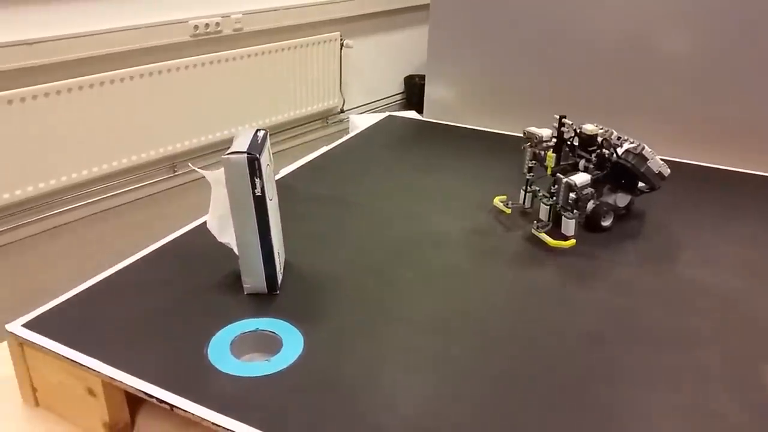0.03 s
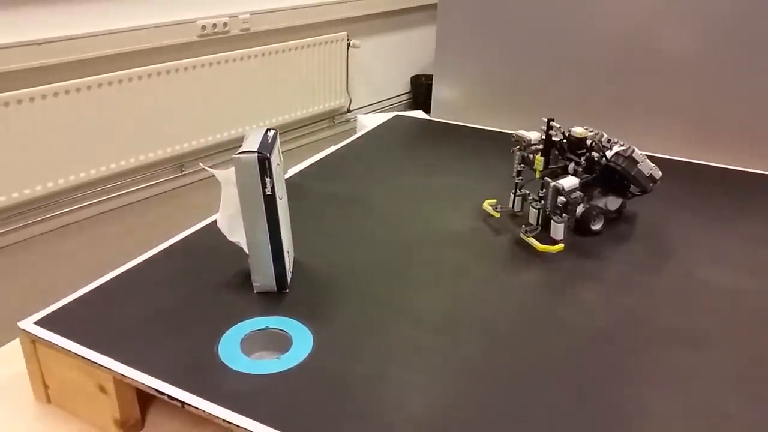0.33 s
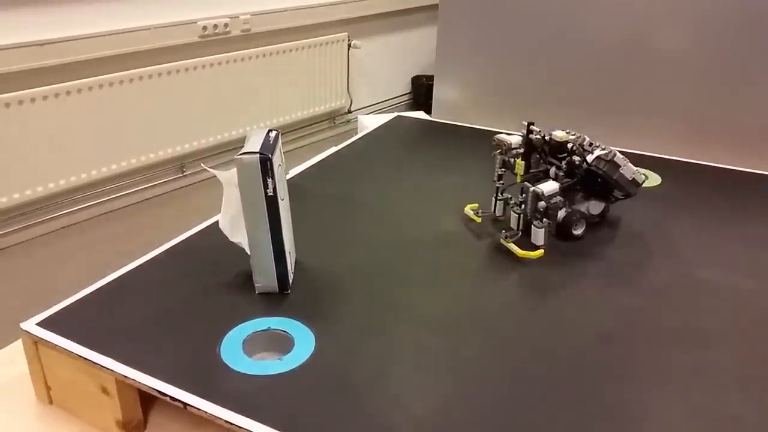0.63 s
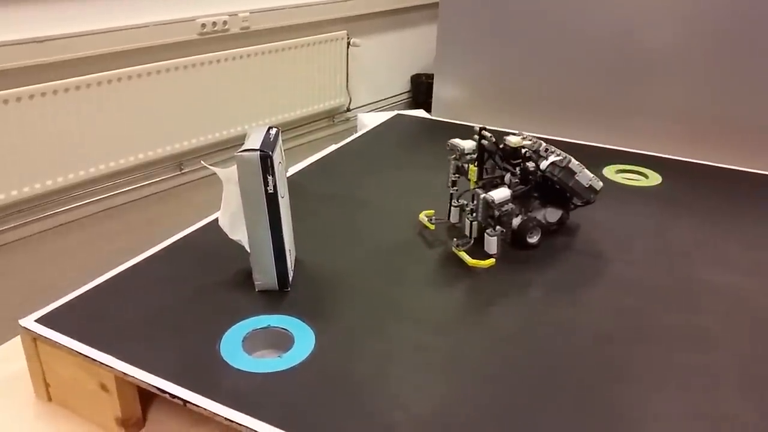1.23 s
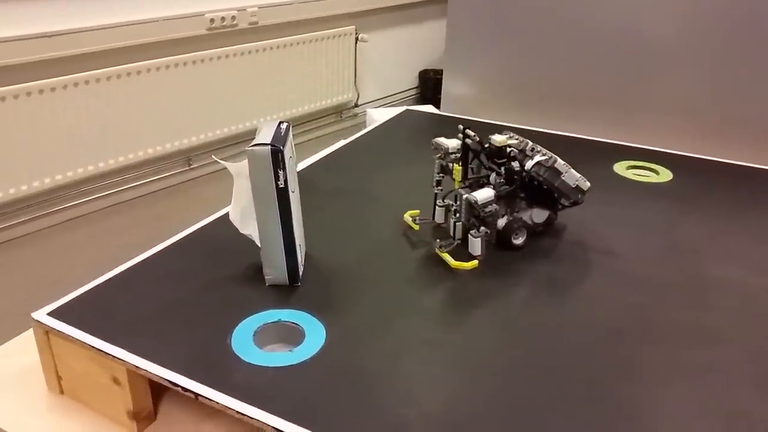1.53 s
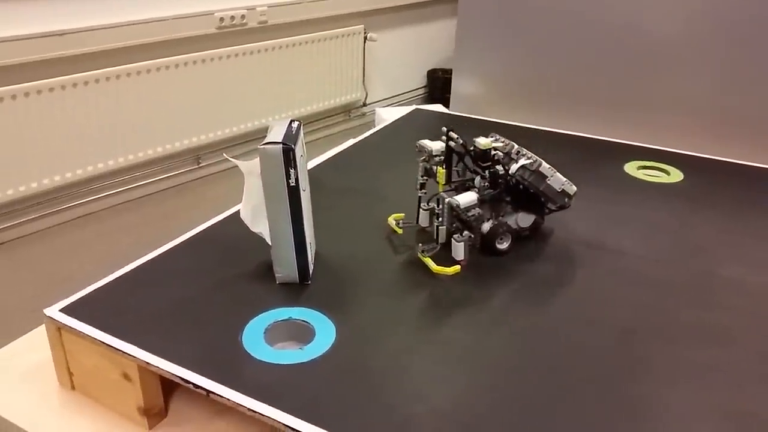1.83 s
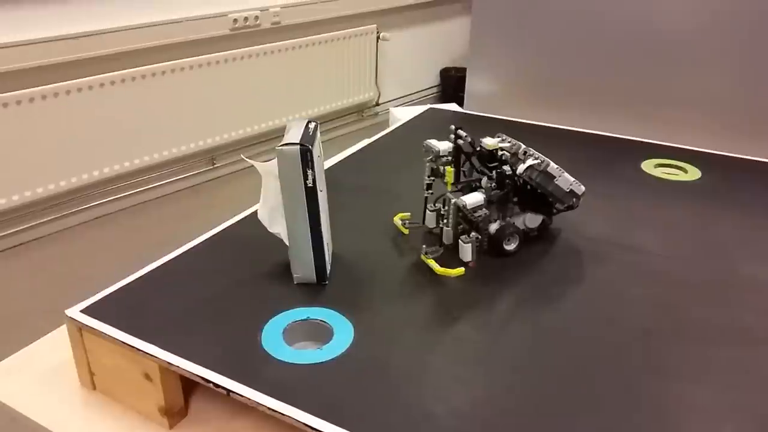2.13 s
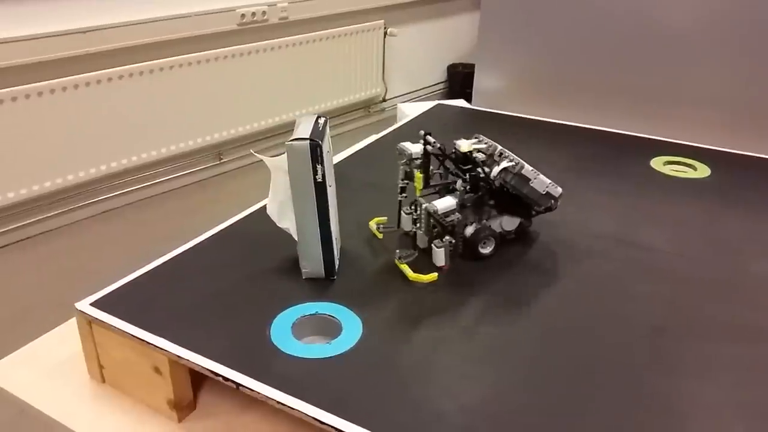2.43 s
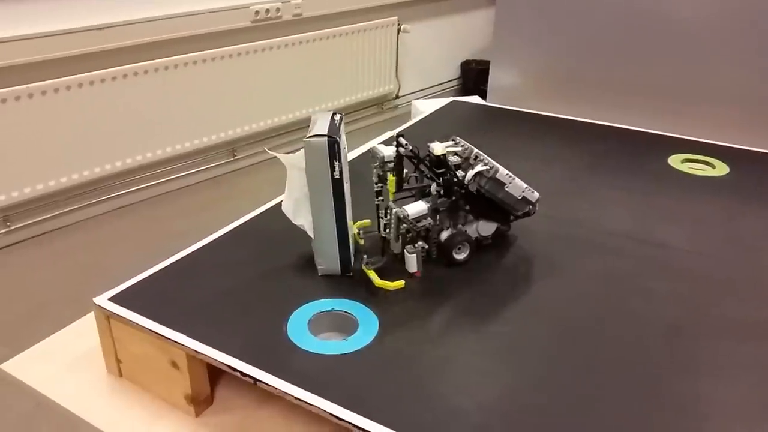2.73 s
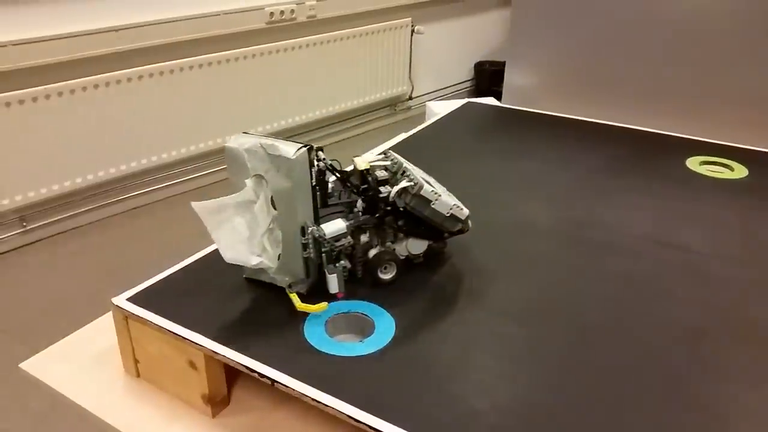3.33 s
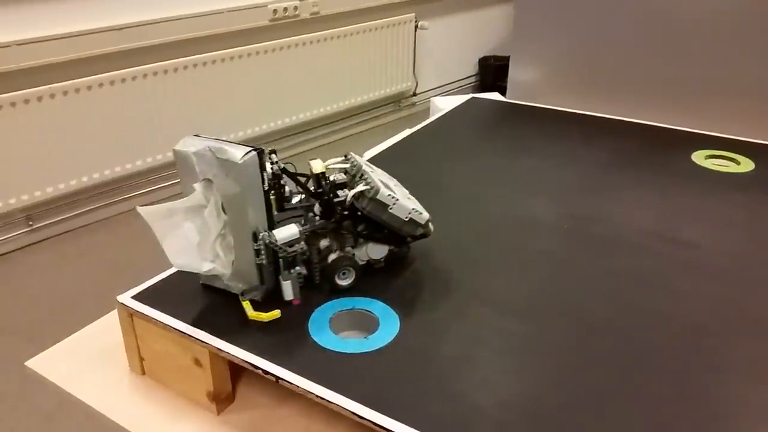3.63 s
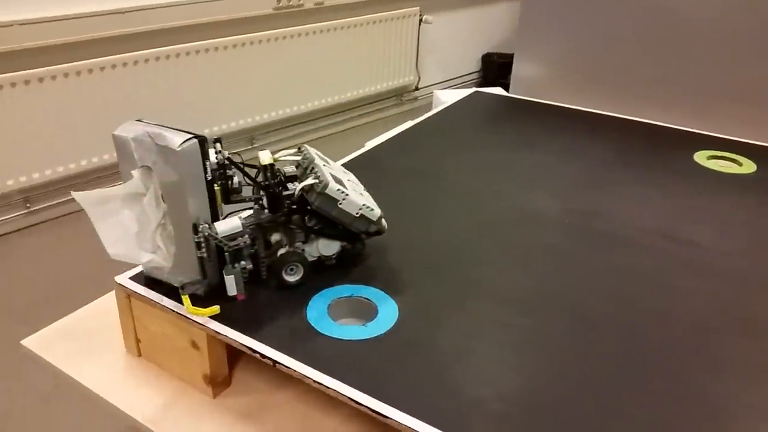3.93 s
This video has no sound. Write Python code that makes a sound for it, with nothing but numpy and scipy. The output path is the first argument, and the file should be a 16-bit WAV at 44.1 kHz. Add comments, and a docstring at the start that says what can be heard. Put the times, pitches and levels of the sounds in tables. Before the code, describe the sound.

Whirring, rattling robot gears stop briefly, then speed up as a box scrapes along.

```python
"""Small robot pushing a box

A robot drives over a table on two geared motors, brakes with a thump, restarts faster, pushes a box.
Gear teeth whine and rattle in the chassis; the wheels make the table top drone and rumble.
The box knocks and scrapes along. Close stereo microphone, small room, low ventilation hum."""
import sys
import numpy as np
from scipy import signal
from scipy.fft import rfft, irfft
from scipy.io import wavfile
from scipy.ndimage import map_coordinates

SR = 44100
rng = np.random.default_rng(int(sys.argv[2]) if len(sys.argv) > 2 else 0)


def wav_record(signal):
    """Record a signal, one row per channel, as 16-bit PCM in the file named by sys.argv[1]."""
    frames = np.transpose(np.atleast_2d(signal))
    bounded = np.clip(frames, -1, 1)
    # unit amplitude maps onto the largest positive 16-bit level
    quanta = np.round(bounded * 32767).astype(np.int16)
    wavfile.write(sys.argv[1], SR, quanta)


N = 176400
T = np.arange(N) / SR
HZ = np.fft.rfftfreq(N, 1 / SR)

# ventilation spectrum: f/Hz, level/dB
VENT_SPECTRUM = [(20, -11), (45, 3), (110, -2.5), (260, -9.5), (700, -29), (3000, -21.5), (16000, -45)]
# table top, main mode and other modes: t/s, level/dB
DRONE_LEVEL = [(0, -42), (.9, -38.5), (1.05, -34), (1.55, -37), (2, -41.5), (2.1, -46.5), (2.24, -38.5),
               (2.32, -45), (3.1, -49), (3.39, -40), (3.5, -44)]
RUMBLE_LEVEL = [(0, -51), (2, -45.5), (2.1, -48), (2.48, -42), (2.78, -42.5), (2.9, -49.5), (3.9, -43)]
# table top, other modes: f/Hz, width/Hz, level/dB
RUMBLE_MODES = [(66, 12, -11.5), (121.2, 22, -9), (190.7, 23, -18.5), (222.3, 13, -14)]
# braking thump: f/Hz, level/dB, t60/s
THUMP_MODES = [(222.3, -4.5, 0.34), (260, -3.5, 0.27), (377, -3.5, 0.38), (453, -9.5, 0.381),
               (589.5, -8, 0.21), (840, -19, 0.1)]
# box knocks: t/s, level/dB, f/Hz, decay/s
BOX_KNOCKS = [(2.732, -36.5, 600.4, 0.021), (2.774, -45, 250, 0.03), (2.908, -41, 850, 0.044),
              (2.945, -37, 801, 0.026), (2.97, -36, 850, 0.014), (3.146, -41.5, 691, 0.031),
              (3.427, -44, 563, .02), (3.515, -40, 195.8, 0.022)]
# box friction: t/s, level/dB
SLIDE_LEVEL = [(2.68, -82), (2.75, -51), (3.5, -43.5), (3.62, -43.5), (3.93, -41), (4, -50)]
# box friction: f/Hz, level/dB
SLIDE_SPECTRUM = [(165, -7), (210, 7), (250, -6), (380, -6), (510, -14.5), (720, -7.5), (930, -6.5),
                  (1250, -23), (6000, -23.5)]
# box rasps: centre t/s, sigma/s, f/Hz, width/Hz, level/dB
BOX_RASPS = [(3.65, 0.05, 2040, 710, -33), (3.43, 0.34, 7620, 560, -36.5)]
# tooth meshing rate: t/s, f/Hz
MESH_RATE = [(0, 386.9), (.5, 426), (.62, 442.1), (1.0, 469.7), (1.82, 533.8), (1.89, 553.7), (2.0, 534),
             (2.1, 297.1), (2.295, 610), (2.33, 756.6), (2.38, 866), (2.435, 945), (2.495, 755),
             (2.6, 725.3), (2.69, 778.5), (2.78, 723), (2.96, 761.2), (3.13, 739.6), (3.29, 765),
             (3.4, 742), (3.65, 753.5), (4, 753.4)]
# gear drive: t/s, rattle level/dB, whine level/dB
DRIVE_LEVEL = [(0, -45, -46.5), (.6, -42.5, -46.5), (1.4, -39.5, -44), (1.88, -38, -43), (1.99, -37, -44),
               (2.025, -52, -49.5), (2.1, -72, -62), (2.23, -57, -66), (2.275, -41, -46),
               (2.32, -33, -42.5), (2.38, -29.5, -40), (2.46, -32, -42.5), (2.53, -34, -44.5),
               (2.68, -32, -43), (3.65, -31.5, -38.5), (4, -33.3, -36.5)]
# tooth rattle before and after the restart: f/Hz, level/dB
SLOW_RATTLE = [(300, -21), (1300, -13.5), (1620, 0), (2300, -2), (3300, -4), (4000, -0.5), (4700, -2),
               (6100, 2.5), (7200, -2), (8200, 2), (9900, -3.5), (10900, -8.5), (12000, -5.5), (13700, -14),
               (15000, -9)]
FAST_RATTLE = [(700, -17), (1320, -15), (1560, -3), (2900, -7.5), (3420, -6.5), (3700, -2.5), (4800, -7),
               (5200, 0), (5550, -5.5), (5950, 1), (6900, -1), (8200, -0.5), (10800, -5.5), (16000, -6.5)]
# mesh harmonics 1-8 before and after the restart: level/dB
SLOW_HARMONICS = [-40, -8.5, -4.5, -7.5, -3.5, -7, -9.5, -14.5]
FAST_HARMONICS = [-5, -2, -8, -6.5, -8, -13, -11.5, -8]
# chassis radiation: f/Hz, gain/dB
CHASSIS_GAIN = [(750, -14.5), (950, -7), (1270, -16.5), (1480, -3), (1660, 6), (1830, 5), (2100, -3),
                (2500, 1), (2850, 0.5), (3350, -14.5), (3750, 1.5), (4400, 1.5), (5150, -0.5), (5700, 0.5)]
# gear play snapping over: t/s, level/dB
BACKLASH_TICKS = [(2.053, -33), (2.135, -38.5), (2.238, -43)]
# motors: speed ratio, level/dB, left minus right/dB
MOTOR_MIX = [(1.003, 1, -5), (.99, -6, 11.5)]
# gear balance: f/Hz, left minus right/dB
GEAR_BALANCE = [(1500, 3.5), (2800, 1.5), (5000, -5.5), (9000, 1.5)]

PINION_TEETH, WHEEL_TEETH = 10, 30


def amp(db):
    """dB to gain."""
    return 10 ** (np.asarray(db) / 20)


def unit(x):
    """Scale to rms 1."""
    return x / np.sqrt(np.mean(x ** 2) + 1e-20)


def noise():
    """White noise, rms 1."""
    return rng.standard_normal(N)


def curve(rows, column=1):
    """Table column interpolated over time."""
    rows = np.array(rows)
    return np.interp(T, rows[:, 0], rows[:, column])


def spectrum_db(rows, hz=HZ):
    """Table interpolated over log frequency."""
    points_hz, db = np.transpose(rows)
    return np.interp(np.log(hz + 1), np.log(points_hz), db)


def shape(x, gain):
    """Filter by a gain per frequency."""
    return irfft(rfft(x) * gain, N)


def colour(x, rows):
    """Filter by a spectrum table, rms 1."""
    return unit(shape(x, amp(spectrum_db(rows))))


def band(x, hz, width_hz):
    """Resonance with steep skirts, rms 1."""
    return unit(shape(x, 1 / (1 + ((HZ - hz) / width_hz * 1.29) ** 2)))


def wander(rate_hz):
    """Smooth random signal, rms 1."""
    bins_hz = HZ[:N // 12]
    white = rng.standard_normal((len(bins_hz), 2)) @ [1, 1j]
    slow = irfft(white / (1 + (bins_hz / rate_hz) ** 4))
    return unit(np.interp(T, np.linspace(0, T[-1], len(slow)), slow))


def strike(start_s, rise_s, decay_s):
    """Quick rise, exponential fall."""
    t = np.maximum(T - start_s, 0)
    return (1 - np.exp(-t / rise_s)) * np.exp(-t / decay_s)


def room(x, wet_db, early_s=0.0072, tail_s=0.054, tail_db=-5):
    """Direct sound, dense early reflections and a short tail, different per channel."""
    t = T[:SR // 5]
    decay = np.exp(-t / early_s) + amp(tail_db) * np.exp(-t / tail_s)
    response = rng.standard_normal((2, len(t))) * decay
    response *= amp(wet_db) / np.linalg.norm(response, axis=1, keepdims=True)
    response[:, 0] += 1
    return signal.fftconvolve(np.atleast_2d(x), response, axes=1)[:, :N] / np.sqrt(1 + amp(wet_db) ** 2)


def moving_room(x, wet_db, hop=4096):
    """Moving source: each reflection pattern fades into the next."""
    x = np.pad(x, ((0, 0), (hop, 2 * hop)))
    out = np.zeros((2, N + SR))
    fade = np.hanning(2 * hop) ** .75
    for at in range(0, N + hop, hop):
        piece = room(x[:, at:at + 2 * hop] * fade, wet_db)
        out[:, at:at + piece.shape[1]] += piece
    return out[:, hop:hop + N]


def ventilation(level_db=-48.5, side_db=-7.5):
    """Steady low air noise, mostly common to both channels."""
    mid = colour(noise(), VENT_SPECTRUM)
    side = amp(side_db) * colour(noise(), VENT_SPECTRUM)
    return amp(level_db) * np.array([mid + side, mid - side]) / np.sqrt(1 + amp(side_db) ** 2)


def rolling(drone_hz=92.2, drift_hz=5.87, throb_db=7):
    """Wheels excite the table top: the main mode drones and throbs, the others rumble."""
    throb = amp(throb_db * np.tanh(wander(19.4)))
    cycles = np.cumsum(drone_hz + drift_hz * wander(23.0)) / SR
    drone = unit(throb * np.sin(2 * np.pi * cycles))
    rumble = unit(sum(amp(db) * band(noise(), hz, width_hz) for hz, width_hz, db in RUMBLE_MODES))
    return amp(curve(DRONE_LEVEL)) * drone + amp(curve(RUMBLE_LEVEL)) * rumble


def thump(at_s=2.141, level_db=-27, rise_s=0.0024):
    """The braking robot rocks down on the table: ringing modes, dull clatter."""
    ring = np.zeros(N)
    for hz, db, t60_s in THUMP_MODES:
        envelope = amp(db) * strike(at_s, rise_s, t60_s / np.log(1000))
        ring += envelope * np.sin(2 * np.pi * (hz * T + rng.random()))
    clatter = amp(-6) * strike(at_s - .006, rise_s, decay_s=0.042) * band(noise(), hz=465, width_hz=290)
    return room(amp(level_db) * (ring + clatter), wet_db=-8)


def friction(grip_db=3):
    """Sliding noise under uneven grip."""
    return noise() * amp(grip_db * wander(57))


def box():
    """The pushed box knocks, slides and rasps on the table."""
    knocks = sum(amp(db) * strike(at_s, 0.0014, decay_s) * band(noise(), hz, width_hz=0.37 * hz)
                 for at_s, db, hz, decay_s in BOX_KNOCKS)
    slide = amp(curve(SLIDE_LEVEL)) * colour(friction(), SLIDE_SPECTRUM)
    rasp = sum(amp(db) * np.exp(-.5 * ((T - at_s) / sigma_s) ** 2) * band(friction(), hz, width_hz)
               for at_s, sigma_s, hz, width_hz, db in BOX_RASPS)
    pan = amp([[.7], [-.7]])
    return room(knocks + slide, wet_db=-5.5) * pan + moving_room(rasp[None], wet_db=6)


def rattle(teeth, mesh_hz, fast, bind_turns=.14, snaps_per_s=55, snap_s=0.005, treble_hz=9400):
    """Teeth slap, unevenly on eccentric shafts; play and the wheel's tight spot add bright snaps."""
    meshing = 1 + 0.52 * np.cos(2 * np.pi * teeth)
    eccentricity = 1 + 0.091 * np.cos(2 * np.pi * teeth / PINION_TEETH)
    grain = amp(0.5 * wander(52) + 2.0 * wander(1600))
    slaps = unit(meshing * eccentricity * grain * noise())
    bind = 1 + 0.59 * np.exp(-(teeth / WHEEL_TEETH % 1) / bind_turns)  # once per wheel turn
    triggers = rng.random(N) < snaps_per_s / SR
    snaps = unit(bind + 1.64 * signal.lfilter([1], [1, -np.exp(-1 / (snap_s * SR))], triggers))
    # top treble grows with speed
    treble = 1 / (1 + (treble_hz / (HZ + 1)) ** 8)
    slow_treble_gain = snaps * amp(14.5 * np.log2(mesh_hz / 447))
    fast_treble_gain = np.minimum(mesh_hz / 774, 1) ** 3
    slow_rattle = colour(slaps, SLOW_RATTLE)
    slow_rattle += shape(slow_rattle, treble) * (slow_treble_gain - 1)
    fast_rattle = colour(slaps * np.sqrt(bind), FAST_RATTLE)
    fast_rattle += shape(fast_rattle, treble) * (fast_treble_gain - 1)
    return np.where(fast, fast_rattle, slow_rattle * np.sqrt(snaps))


def whine(teeth, mesh_hz, fast, flutter_depth=0.61):
    """Mesh harmonics with shaft sidebands; each swells as it passes a chassis resonance."""
    shafts = np.sin(2 * np.pi * teeth / PINION_TEETH) + np.sin(2 * np.pi * teeth / WHEEL_TEETH)
    wobble_rad = np.where(fast, 0.115, 0.23)
    phase = 2 * np.pi * teeth + wobble_rad * shafts
    out = np.zeros(N)
    for k, (slow_db, fast_db) in enumerate(zip(SLOW_HARMONICS, FAST_HARMONICS), 1):
        db = np.where(fast, fast_db, slow_db) + spectrum_db(CHASSIS_GAIN, k * mesh_hz)
        flutter = (1 + flutter_depth * wander(31)) / np.sqrt(1 + flutter_depth ** 2)
        out += amp(db) * flutter * np.cos(k * phase + rng.uniform(0, 2 * np.pi))
    return out


def pass_by(x, start_samples=6.63, end_samples=-0.58):
    """Left-channel lag shrinks through zero as the robot crosses the microphone."""
    delayed = np.arange(N) - np.linspace(start_samples, end_samples, N)
    return np.array([map_coordinates(x[0], [delayed], order=3), x[1]])


def gears(restart_s=2.18):
    """Two geared motors at nearly one speed: rattle, whine, backlash ticks."""
    fast = T > restart_s
    jitter = np.where(fast, .006, .007)
    rattles, whines = np.zeros((2, N)), np.zeros((2, N))
    for ratio, db, pan_db in MOTOR_MIX:
        mesh_hz = curve(MESH_RATE) * ratio * (1 + jitter * wander(28.2))
        teeth = np.cumsum(mesh_hz) / SR
        gains = amp([[db + pan_db / 2], [db - pan_db / 2]])
        rattles += gains * amp(curve(DRIVE_LEVEL, column=1)) * rattle(teeth, mesh_hz, fast)
        whines += gains * amp(curve(DRIVE_LEVEL, column=2)) * whine(teeth, mesh_hz, fast)
    for at_s, db in BACKLASH_TICKS:
        rattles += amp(db) * strike(at_s, rise_s=0.00071, decay_s=0.006) * colour(noise(), FAST_RATTLE)
    drive = moving_room(pass_by(rattles), wet_db=5.5) + moving_room(pass_by(whines), wet_db=-3.0)
    balance_db = spectrum_db(GEAR_BALANCE)
    return shape(drive, amp([balance_db / 2, -balance_db / 2]))


def scene():
    """Stereo sum of all sources."""
    return gears() + rolling() + thump() + box() + ventilation()


def record(dry):
    """Low-pass at 15850 Hz."""
    lowpass = signal.firwin(601, 15850, window=("kaiser", 9), fs=SR)
    return signal.oaconvolve(dry, lowpass[None], "same")


dry = scene()
out = record(dry)
wav_record(out)
```